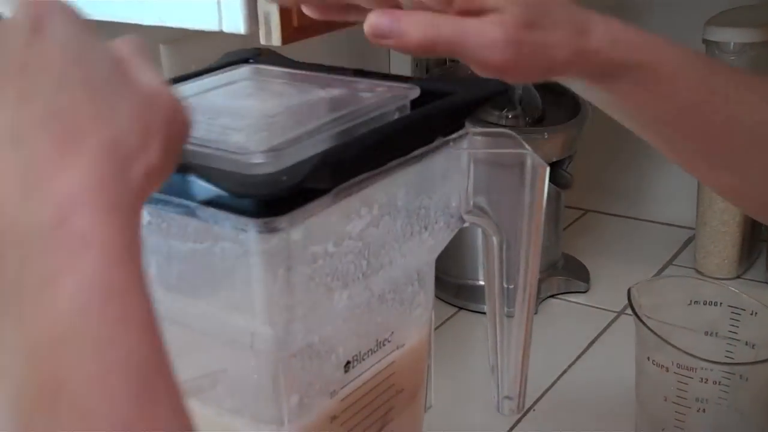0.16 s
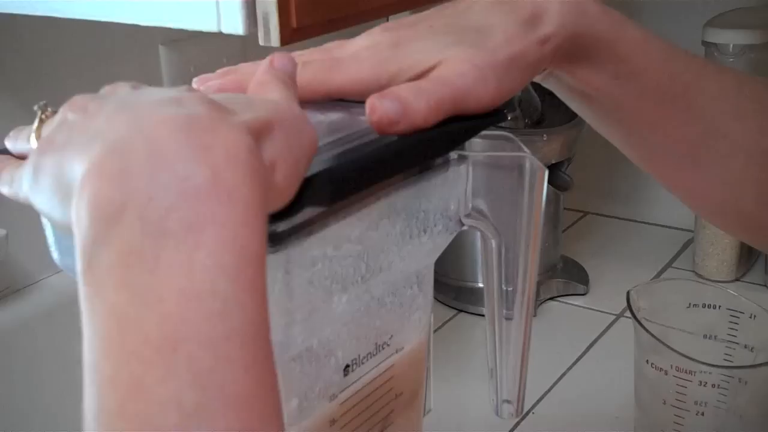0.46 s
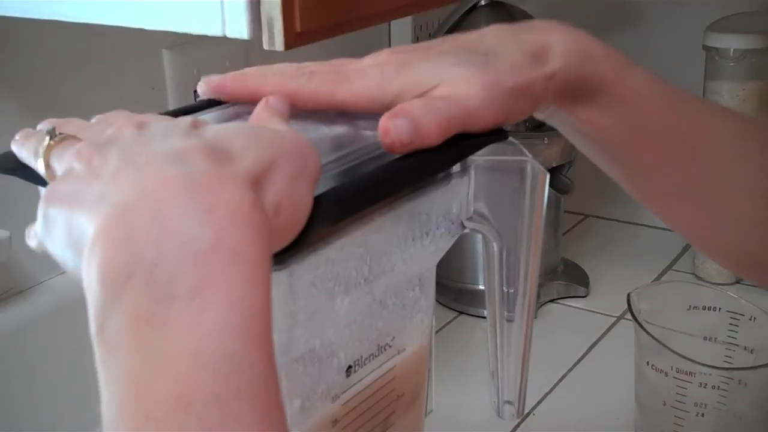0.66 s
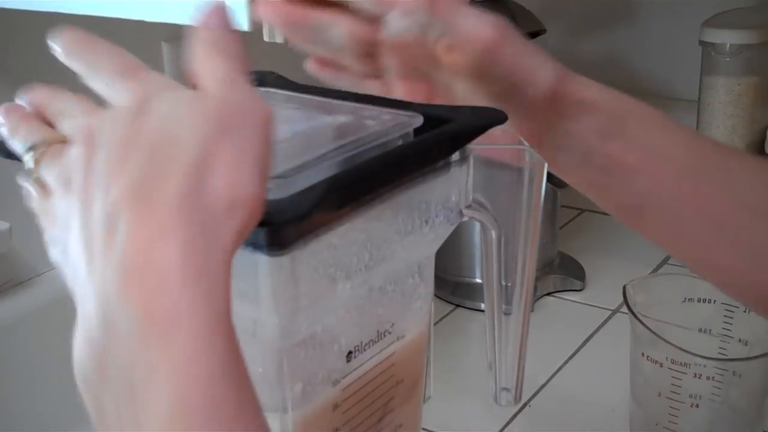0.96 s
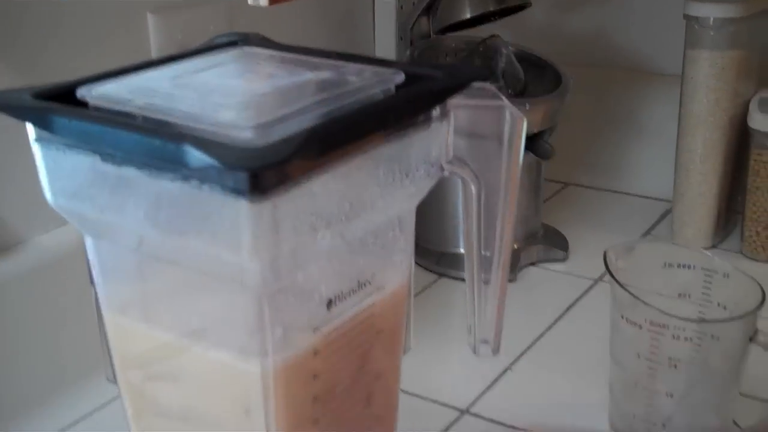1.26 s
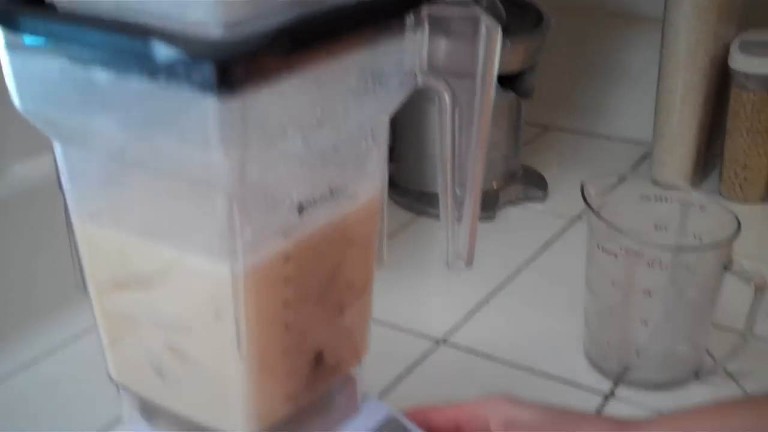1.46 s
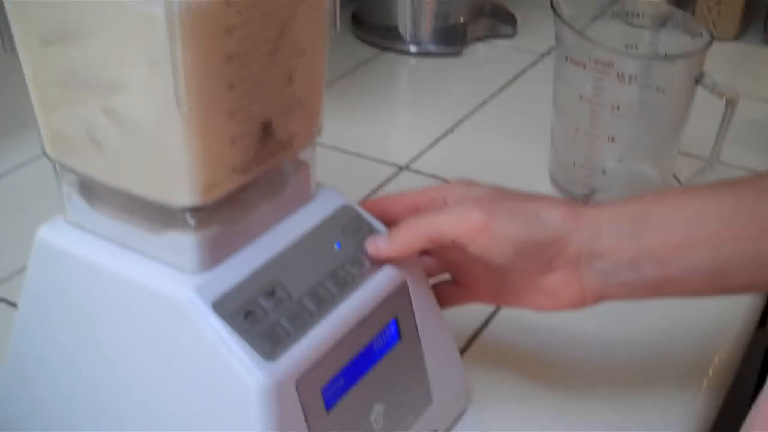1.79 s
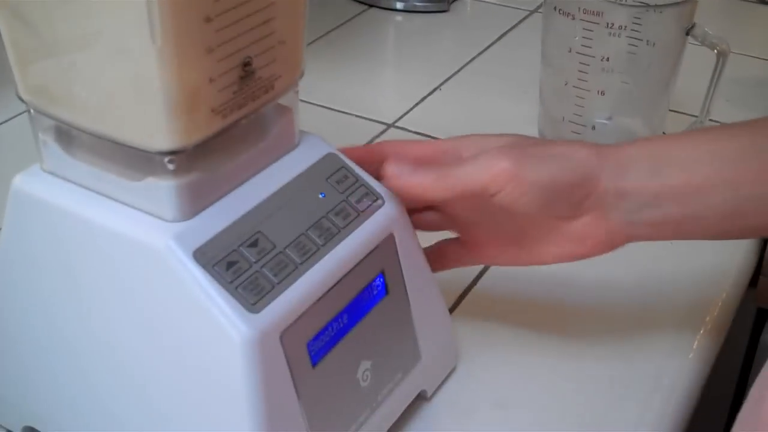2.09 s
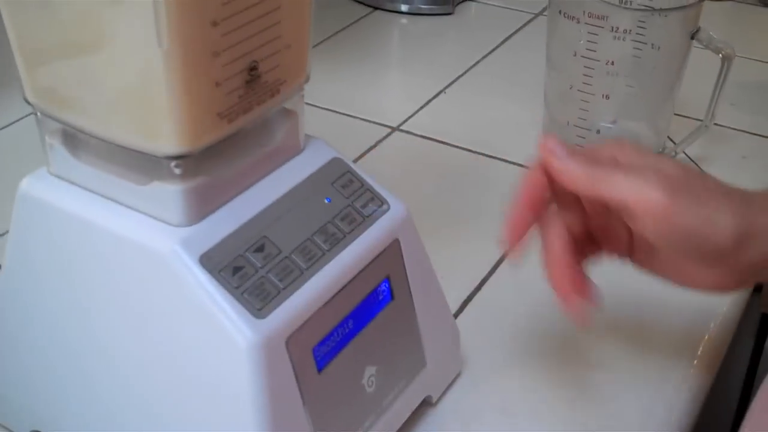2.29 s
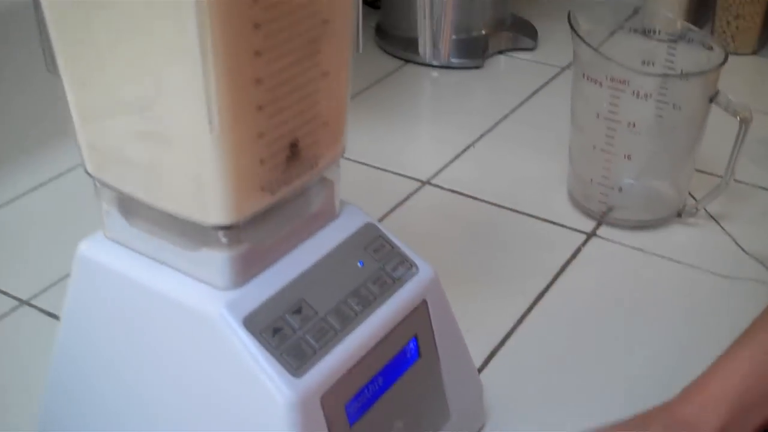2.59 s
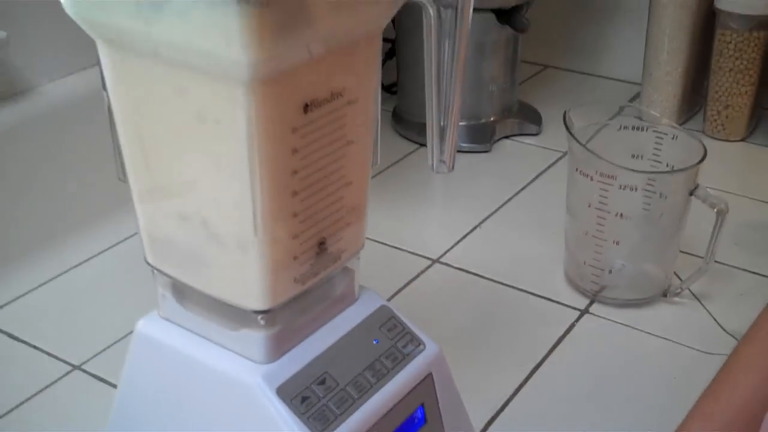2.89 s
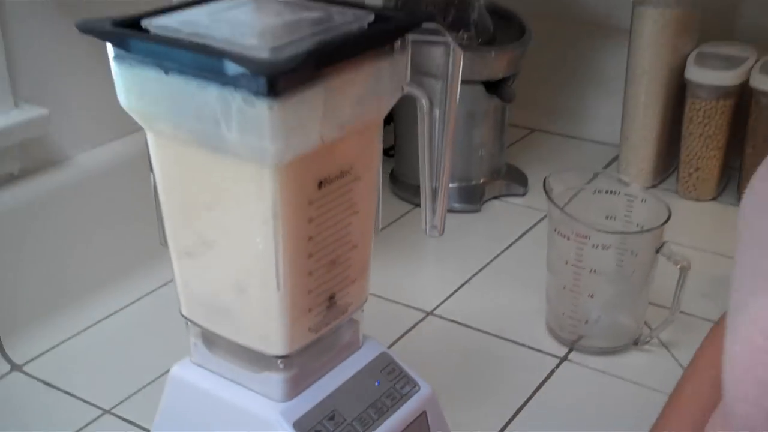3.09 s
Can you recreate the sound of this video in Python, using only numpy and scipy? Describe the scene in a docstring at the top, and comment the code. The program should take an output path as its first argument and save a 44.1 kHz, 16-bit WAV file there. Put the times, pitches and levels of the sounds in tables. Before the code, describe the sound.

Blender grinding ice loudly: first quiet room hum, plastic lid snaps and brief hand rubbing, a pause, a sharp button click, then sudden churning, rattling and cracking, recorded close in a reflective kitchen with clipped peaks.

```python
"""Blender crushing ice in a tiled kitchen

A plastic lid is pressed onto a blender jar while a fridge hums; a keypad button clicks and the motor starts.
Sine modes and noise-shaken resonances form the lid and button; churning noise, random chips and ice cracks
excite the jar, its walls and the blades. Tiles add a decaying echo; a close stereo camera clips the loudest
cracks, and low noise bursts stand for its overload."""
import sys
import numpy as np
from scipy import signal
from scipy.fft import rfft, irfft, next_fast_len
from scipy.io import wavfile
from scipy.ndimage import uniform_filter1d, map_coordinates

SR = 44100
rng = np.random.default_rng(int(sys.argv[2]) if len(sys.argv) > 2 else 0)


def waveform_to_disk(signal):
    """Save audio, clipped to [-1, 1], as 16-bit WAV at the path in sys.argv[1]."""
    frames = np.transpose(np.atleast_2d(signal))
    scaled = np.clip(frames, -1, 1) * 32767
    samples = np.round(scaled).astype(np.int16)
    wavfile.write(sys.argv[1], SR, samples)


N = 143325

# Body modes: centre_hz, nominal width_hz, relative level_db. Spectra: frequency_hz, relative density_db.
# Likeness: frequency_hz, left-right correlation (below 0 counts as 0). Balance: frequency_hz, left_minus_right_db.

# Fridge hum partials: pitch_hz, rms level_db before wavering
FRIDGE_HUM = [(129.2, -57.5), (193.8, -66), (258.4, -62.5), (317.6, -62.5)]
# Room noise spectrum: frequency_hz, density_db
AIR_SPECTRUM = [(15, -48), (25, -8), (92, -10), (129, -1), (160, -5.5), (190, -3.5), (310, -3), (440, -6),
                (860, -11.5), (937, -6), (1020, -13), (2000, -15), (3300, -20.5), (6000, -19.5),
                (7600, -18.5), (9000, -27.5), (14100, -33)]
# Room noise likeness: frequency_hz, correlation
AIR_LIKENESS = [(60, -0.21), (180, 0.96), (530, 0.9), (1560, 0.41), (4600, -0.07), (13600, -1.1)]
# Room noise balance: frequency_hz, left_minus_right_db
AIR_LEAN = [(60, -2.5), (370, 0), (2230, 0.5), (13600, 3)]
AIR_DB = -50

# Tile reverberation: frequency_hz, t60_s
TILE_DECAY = [(200, 0.6), (2000, 0.27), (10000, 0.19)]
# Likeness of the echo: frequency_hz, correlation
TILE_LIKENESS = [(100, 1), (1000, 0.91), (4000, 0.07)]
WET_DB = -12

# Likeness of the struck bodies: frequency_hz, correlation
BODY_LIKENESS = [(60, 0.42), (130, 0.91), (280, 1), (610, 0.99), (1330, 0.87), (2890, 0.79), (6280, 0.11),
                 (13600, 0.036)]
# Balance of the struck bodies: frequency_hz, left_minus_right_db
BODY_LEAN = [(60, 1.5), (400, -0.5), (1200, 1), (3100, .5), (5100, -5), (7000, 3.5), (8300, 16.5),
             (13600, 16)]

# Low thumps of the overloaded recorder at loud cracks: start_s, level_db
OVERLOAD_THUMPS = [(2.128, -21.5), (2.2, -37), (2.545, -25.5), (2.69, -30.5)]
# Spectrum of the overload: frequency_hz, density_db
OVERLOAD_SPECTRUM = [(20, -11), (55, -10), (110, -7), (200, -29)]
OVERLOAD_T60_S = 0.08

# Lid contacts: start_s, level_db, thump_db and treble_db over it, pitch_hz, reference t60_s
LID_CONTACTS = [(0.006, -44, 4.5, 3.5, 1530, 0.048), (0.08, -46, 0, 6, 1010, 0.036),
                (0.324, -44.5, 1, 4.5, 1340, 0.06), (0.371, -28.5, -13, -15, 1504, 0.094),
                (0.379, -26, -13, -12, 972, 0.089), (0.386, -19.5, -7, -12, 1140, 0.043),
                (0.394, -26, -10, -13, 1310, 0.047), (0.4048, -27.5, -24, -2, 1940, 0.029),
                (0.414, -34, -14, -18, 1264, 0.069), (0.493, -32, -16, -5.5, 1840, 0.061),
                (0.565, -43.5, 5.5, -10, 1900, 0.054), (0.5993, -34.5, -13, -27, 1150, 0.057),
                (0.8494, -28.5, -18, -14, 1043, 0.1), (0.92, -37.5, 3.5, -6, 2510, 0.038),
                (0.927, -38.5, -3.5, 0, 1056, 0.079), (0.9597, -44, -2, 0, 1950, 0.04)]
# Air and walls of the hollow jar: centre_hz, width_hz, level_db
HOLLOW_MODES = [(318, 49, 7), (594, 44, 9.5)]
# Treble modes of a snap: centre_hz, width_hz, level_db
SNAP_MODES = [(5780, 880, 0.5), (7200, 500, -0.5)]
# Hands rubbing the lid: time_s, level_db before the grain
HAND_RUB = [(0.299, -53.5), (.355, -51), (.39, -39), (.45, -53), (.58, -58), (.7, -70), (.9, -63),
            (.95, -49.5), (1.03, -71)]
# Spectrum of the rub: frequency_hz, density_db
SKIN_SPECTRUM = [(300, -29), (600, 0.5), (2000, -1.5), (3500, -6), (6000, -5.5), (8000, -10), (10000, -38)]
TWIN_RATIO, OVERTONE_RATIO = 1.11, 1.7  # close mode that beats; second mode
KNOCK_DB, KNOCK_LIFE = -3.5, 0.67  # ring over the contact level; share of its t60
TICK_DB = 4  # first instant over the treble level

# Button contacts: start_s, level_db, treble_db and low_db over it, reference t60_s
BUTTON_CONTACTS = [(1.6738, -36, -0.5, -14, 0.061), (1.715, -13.5, -27, -16, 0.059)]
# Keypad modes: centre_hz, width_hz, level_db
KEY_MODES = [(2310, 200, 3), (2960, 100, 4), (3670, 140, 1.5)]
# Panel modes: centre_hz, width_hz, level_db
PANEL_MODES = [(404, 45, -4), (587, 62, -4), (1060, 240, -9)]
DOME_DB, REBOUND_S, REBOUND_DB = 7, 0.0028, -4  # sharp blow over the contact level; its second strike

# Churn: time_s, jar level_db, rattle_db and hiss_db over it, all before the layer trims
CHURN = [(1.963, -24, 1.5, 6), (1.989, -16, -9.5, -21), (2.0, -18, -8, -5), (2.085, -18.5, -2.5, -3.5),
         (2.112, -18.5, -3.5, -11.5), (2.133, -20, 12.5, -3), (2.148, -16.5, -18, -13),
         (2.162, -20.5, 1, -3), (2.179, -10.5, -8, -5.5), (2.219, -25.5, 2, -3), (2.243, -12.5, -7, -4.5),
         (2.269, -20, -4, -6), (2.33, -13, -2.5, -3.5), (2.353, -23, -0.5, -0.5), (2.55, -23.5, 0, 3),
         (2.588, -17.5, -4.5, -1), (2.642, -27, 7, 7), (2.685, -15, -3.5, -2.5), (2.75, -24.5, 2.5, 1),
         (2.8, -20, 0.5, 0.5), (2.87, -27, -0.5, 2), (2.916, -29, 4.5, 7), (2.957, -17.5, -1.5, 1),
         (2.981, -26, 1, 4.5), (3.026, -24, 2, 4), (3.1, -26, 3.5, 7), (3.14, -30.5, 8, 8),
         (3.174, -21, 0.5, 1), (3.206, -29.5, 4.5, 7), (3.25, -18.5, -4, -2)]
# Ice cracks: start_s, level_db, blade_ring_db over it, reference t60_s
ICE_CRACKS = [(1.958, -19.5, -5.5, 0.032), (2.0001, -16.5, 1.5, 0.032), (2.032, -13, 0, 0.032),
              (2.064, -7, -4.5, 0.034), (2.1216, -5.5, -10, 0.045), (2.1287, 0.5, -2.5, 0.05),
              (2.136, 0, 0.5, 0.025), (2.165, -8, -2, 0.011), (2.179, -2, -3, 0.024),
              (2.2007, -6, 8.5, 0.025), (2.224, -11, -7, 0.062), (2.228, -9, -4.5, 0.058),
              (2.2946, -5, -6, 0.057), (2.319, -6.5, -7, 0.072), (2.369, -8.5, -2.5, 0.047),
              (2.4807, -14, 3.5, 0.021), (2.522, -12.5, -1, 0.028), (2.5463, -17, 7, 0.015),
              (2.577, -9.5, -4.5, 0.053), (2.691, -4.5, -11, 0.024), (2.852, -19.5, 9, 0.017),
              (2.932, -14.5, -4, 0.052), (3.157, -9.5, -3.5, 0.042)]
# Jar modes: centre_hz, width_hz, level_db
JAR_MODES = [(357.3, 27, 3), (461.6, 53, 2.5), (610, 44, -2.5)]
# Jar wall modes: centre_hz, width_hz, level_db
WALL_MODES = [(1004, 64, -2.5), (2030, 22, -4.5), (3145, 41, -9)]
# Blade modes: centre_hz, width_hz, level_db
BLADE_MODES = [(5470, 230, -5.5), (6170, 130, 1), (6270, 280, 0.5), (7060, 180, 0), (7580, 260, 4)]
# Broad spectrum under the jar modes: frequency_hz, density_db
JAR_SPECTRUM = [(15, -74), (81, -44), (151, -15.5), (300, 2), (465, -7.5), (533, 1.5), (647, -3),
                (900, -15.5), (1980, -120)]
# Broad spectrum under the wall modes: frequency_hz, density_db
WALL_SPECTRUM = [(410, -29.5), (700, -8), (990, -1), (1320, -7.5), (1500, -2.5), (4600, -12), (10100, -120)]
# Broad spectrum under the blade modes: frequency_hz, density_db
BLADE_SPECTRUM = [(2350, -33), (4000, -11.5), (4940, -3), (5970, 3.5), (6810, -2.5), (7680, -2),
                  (9140, -16.5), (14100, -31)]
# Loudest slosh, sliding up and down: time_s, pitch_hz
SLOSH_GLIDE = [(2.0, 362), (2.11, 370), (2.15, 435), (2.185, 520), (2.245, 328), (2.3, 503), (2.4, 358),
               (2.53, 476), (2.7, 373), (3.25, 334)]
START_S, RISE_S = 1.957, 0.0063
CHIPS_PER_S, CHIP_T60_S = 150, 0.044
CHIP_SPREAD_DB, CHIP_MAX_DB = 4, 6  # mean and cap of the random levels, before scaling to unit power
THUD_DB = -8.5  # crack in the jar over its level, before the layer trim
SLOSH_DB, SLOSH_OCTAVES = 5.5, 0.19  # lift and Gaussian width
PATCHY_DB = 1.57  # rms swell of the tumbling churn

CLIP, KNEE = 0.84, 8.6  # ceiling amplitude; hardness of the bend
TOP_HZ = 14240


def amp(db):
    """Level law: twenty decibels per factor of ten in amplitude."""
    return 10 ** (np.asarray(db) / 20)


def unit(x):
    """Normalisation to an rms of one."""
    return x / np.sqrt(np.mean(x ** 2) + 1e-20)


def along(points, hz):
    """Linear interpolation of (frequency, value) points on a logarithmic axis."""
    f, v = np.transpose(points)
    return np.interp(np.log(hz + 1), np.log(f + 1), v)


def filtered(x, response):
    """Linear filtering: the spectrum times a complex response of frequency."""
    m = next_fast_len(N + SR // 4, real=True)
    return irfft(rfft(x, m) * response(np.fft.rfftfreq(m, 1 / SR)), m)[..., :N]


def body(modes, bed=None, bed_db=-6):
    """Modal resonance over an optional broad bed: minimum phase, unit power gain for white noise."""
    def response(f):
        power = 1e-12 + 0 * f
        for c, w, db in modes:
            power = power + np.abs(amp(db) * f * w / (c * c - f * f + 1j * f * w)) ** 2
        power = power * power / (power + 0.041 * power.max())  # lowers the skirts
        if bed:
            power = bool(modes) * power / power.max() + amp(along(bed, f) + bed_db) ** 2
        # folding the cepstrum makes the response causal
        cepstrum = irfft(np.log(power + 1e-12) / 2)
        half = len(cepstrum) // 2
        cepstrum[1:half] *= 2
        cepstrum[half + 1:] = 0
        h = np.exp(rfft(cepstrum))
        return h / np.sqrt(np.mean(np.abs(h) ** 2))
    return response


def pair(envelope, likeness, balance, response):
    """Partial coherence: two independent noises mix as mid and side to set likeness and balance."""
    m = next_fast_len(N + SR // 4, real=True)
    hz = np.fft.rfftfreq(m, 1 / SR)
    a, b = rfft(envelope * rng.standard_normal((2, N)), m) * response(hz)
    turn = np.arccos(np.clip(along(likeness, hz), 0, 1)) / 2
    lean = amp(along(balance, hz) / 2)
    mid, side = np.cos(turn) * a, np.sin(turn) * b
    return irfft(np.array([(mid + side) * lean, (mid - side) / lean]), m)[:, :N]


def bursts(times, dbs, t60s):
    """Exponential decay after sudden onsets, whose powers add."""
    power = np.zeros(N + SR)
    for s, db, t60 in zip(times, dbs, np.clip(t60s, .003, .5)):
        t = np.arange(round(t60 * SR)) / SR
        power[round(s * SR):][:len(t)] += amp(db - 60 * t / t60) ** 2
    return np.sqrt(power[:N])


def struck(envelope, response):
    """Forced resonance: a body shaken by noise under an envelope."""
    return pair(envelope, BODY_LIKENESS, BODY_LEAN, response)


def kitchen_air():
    """Broadband room noise plus fridge hum: steady sine partials whose levels waver randomly."""
    t = np.arange(N) / SR
    noise = unit(pair(1, AIR_LIKENESS, AIR_LEAN, lambda hz: amp(along(AIR_SPECTRUM, hz))))
    hum = 0
    for hz, db in FRIDGE_HUM:
        waver_db = 2.0 * map_coordinates(rng.standard_normal(90), [t * 25])
        hum = hum + np.sqrt(2) * amp(db + waver_db) * np.sin(2 * np.pi * (hz * t + rng.random()))
    return amp(AIR_DB) * noise + hum


def tiles(x):
    """Reverberation: convolution with noise that decays at each frequency's own rate, its bass alike."""
    hz, t, z = signal.stft(rng.standard_normal((2, SR // 2)), SR, nperseg=256)
    turn = np.arccos(np.clip(along(TILE_LIKENESS, hz), 0, 1))[:, None] / 2
    side_sign = np.array([1, -1])[:, None, None]
    z = np.cos(turn) * z[0] + side_sign * np.sin(turn) * z[1]
    decay = amp(-60 * t / along(TILE_DECAY, hz)[:, None])
    tail = signal.istft(z * decay, SR, nperseg=256)[1]
    delayed = np.pad(x, ((0, 0), (200, 0)))  # samples before the echo
    return signal.fftconvolve(delayed, tail / np.linalg.norm(tail[0]), axes=1)[:, :N]


def overload():
    """Overload: low noise bursts, independent left and right, as loud cracks clip each channel unevenly."""
    s, db = np.transpose(OVERLOAD_THUMPS)
    envelope = bursts(s, db, np.full(len(s), OVERLOAD_T60_S))
    return filtered(envelope * rng.standard_normal((2, N)), body([], OVERLOAD_SPECTRUM))


def lid():
    """Impact and friction: contacts snap, ring plastic modes and thump the hollow jar; hands rub between."""
    s, db, thump, treble, pitch, t60 = np.transpose(LID_CONTACTS)
    knocks, t = np.zeros(N + SR), np.arange(SR // 5) / SR
    for start, level, life, hz in zip(s, db, t60, pitch):
        beating = np.sin(2 * np.pi * hz * t) + np.sin(2 * np.pi * TWIN_RATIO * hz * t)
        ring = 0.68 * beating + 0.41 * np.sin(2 * np.pi * OVERTONE_RATIO * hz * t)
        knocks[round(start * SR):][:len(t)] += amp(level + KNOCK_DB - 60 * t / (KNOCK_LIFE * life)) * ring

    time = np.arange(N) / SR
    rub_s, rub_db = np.transpose(HAND_RUB)
    grain_db = 3 * map_coordinates(rng.standard_normal(300), [time * 80])
    rub = amp(np.interp(time, rub_s, rub_db, -120, -120) + grain_db)

    thumps = struck(bursts(s, db + thump, t60), body(HOLLOW_MODES))
    tick = bursts(s, db + treble + TICK_DB, 0.036 * t60)
    snaps = struck(np.hypot(bursts(s, db + treble - 6.5, 0.59 * t60), tick), body(SNAP_MODES))
    scuffs = struck(np.hypot(rub, bursts(s, db - 14, 0.73 * t60)), body([], SKIN_SPECTRUM))
    return knocks[:N] + thumps + snaps + scuffs


def button():
    """Snap-through: a finger touches the keypad, then its dome strikes twice and knocks the panel."""
    s, db, treble, low, t60 = np.transpose(BUTTON_CONTACTS)
    dome = np.zeros(N)
    strikes = [round(s[-1] * SR), round((s[-1] + REBOUND_S) * SR)]
    dome[strikes] = amp(db[-1] + DOME_DB + np.array([0, REBOUND_DB]))
    blow = filtered(dome, body([(hz, 3 * w, g) for hz, w, g in KEY_MODES]))
    key = struck(bursts(s, db - 16.5, 1.1 * t60), body(KEY_MODES))
    panel = struck(bursts(s + 0.0026, db + low - 4.5, 1.86 * t60), body(PANEL_MODES))
    snap = struck(bursts(s, db + treble - 5.5, t60), body(SNAP_MODES))
    return blow + key + panel + snap


def patchy(x):
    """Random modulation: tumbling churn swells in patches some hundred Hz wide and tens of ms long."""
    z = signal.stft(x, nperseg=512)[2]
    field = uniform_filter1d(rng.standard_normal(z.shape[1:]), size=6, axis=0)
    field = uniform_filter1d(field, size=7, axis=1)
    return signal.istft(z * amp(PATCHY_DB * unit(field) - 1), nperseg=512)[1][:, :N]


def sloshed(x):
    """Moving resonance: a raised band follows the sliding pitch of the slosh."""
    hz, t, z = signal.stft(x, SR, nperseg=1024, noverlap=768)
    centre = np.interp(t, *np.transpose(SLOSH_GLIDE))
    offset = np.log2((hz[:, None] + 1) / centre) / SLOSH_OCTAVES
    lift = amp(SLOSH_DB * np.exp(-offset ** 2))
    return signal.istft(z * lift, SR, nperseg=1024, noverlap=768)[1][:, :N]


def ice_chips():
    """Poisson process: random small impacts from the motor's start, scaled to unit mean power."""
    draws = rng.random((400, 2))
    at = START_S + np.cumsum(-np.log(draws[:, 0])) / CHIPS_PER_S
    keep = at < N / SR
    level_db = np.minimum(-CHIP_SPREAD_DB * np.log(draws[keep, 1]), CHIP_MAX_DB)
    chips = bursts(at[keep], level_db, np.full(keep.sum(), CHIP_T60_S))
    return chips / np.sqrt(np.mean(chips[np.arange(N) / SR > START_S] ** 2))


def blender():
    """Flow and impact excitation: churn, chips and big cracks shake the jar, its walls and the blades."""
    t = np.arange(N) / SR
    s, jar_db, wall_db, blade_db = np.transpose(CHURN)
    on = np.clip((t - START_S) / RISE_S, 0, 1)
    chips = ice_chips()
    crack_s, crack_db, ring_db, t60 = np.transpose(ICE_CRACKS)

    def layer(level_db, chip_share, hit_db, life, response):
        """Superposition of steady flow and chips, by share of power, with cracks that start sharply."""
        mix = np.sqrt(1 - chip_share + chip_share * chips ** 2)
        flow = on * amp(np.interp(t, s, level_db)) * mix
        onset = bursts(crack_s, hit_db + 4, 0.13 * t60)
        cracks = np.hypot(bursts(crack_s, hit_db, life * t60), onset)
        return patchy(struck(flow, response)) + struck(cracks, response)

    jar_body = body(JAR_MODES, JAR_SPECTRUM, bed_db=-4.0)
    wall_body = body(WALL_MODES, WALL_SPECTRUM, bed_db=-1.5)
    blade_body = body(BLADE_MODES, BLADE_SPECTRUM, bed_db=-3)
    jar = sloshed(layer(jar_db - 3.0, 0.14, crack_db + THUD_DB - 3, 0.99, jar_body))
    walls = layer(jar_db + wall_db, 0.39, crack_db - 9, 1.37, wall_body)
    blades = layer(jar_db + blade_db, 0.34, crack_db + ring_db - 1.0, 0.55, blade_body)
    return jar + walls + blades


def scene():
    """Superposition of the near sources, their echo, the room and the overload bursts."""
    near = lid() + button() + blender()
    return near + amp(WET_DB) * tiles(near) + kitchen_air() + overload()


def record(dry):
    """Saturation and band limit: the camera clips the loudest cracks and drops the top treble."""
    clipped = dry / (1 + np.abs(dry / CLIP) ** KNEE) ** (1 / KNEE)
    return filtered(clipped, lambda hz: hz < TOP_HZ)


dry = scene()
out = record(dry)
waveform_to_disk(out)
```